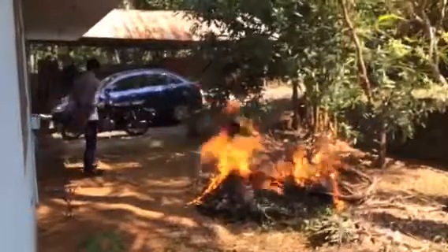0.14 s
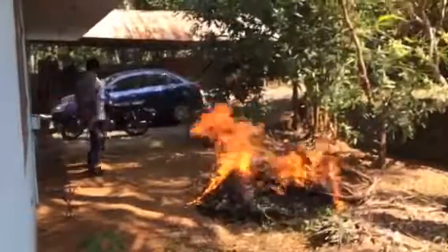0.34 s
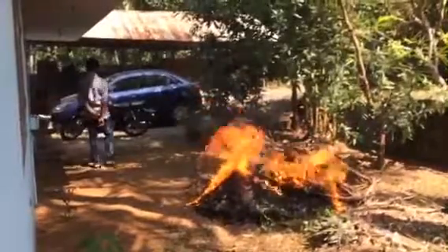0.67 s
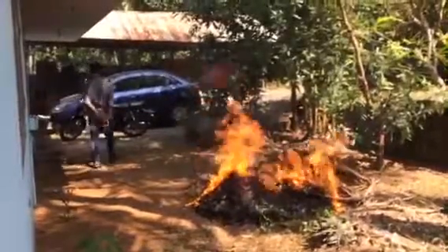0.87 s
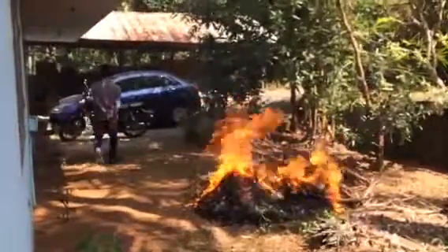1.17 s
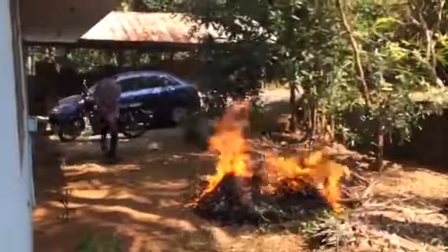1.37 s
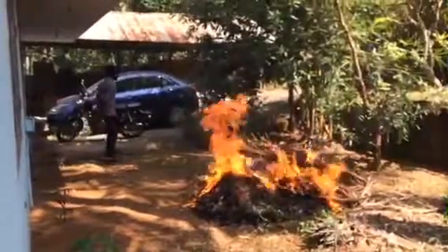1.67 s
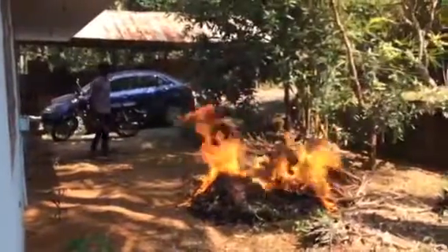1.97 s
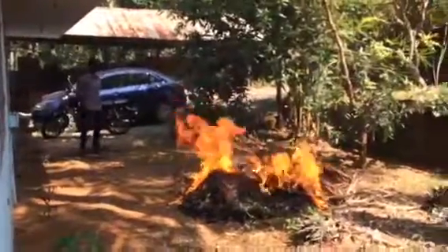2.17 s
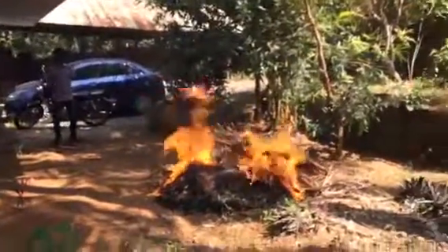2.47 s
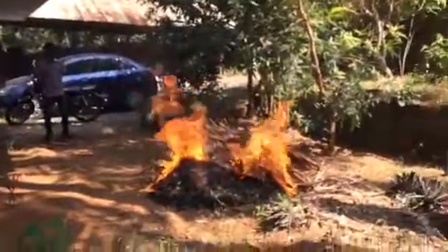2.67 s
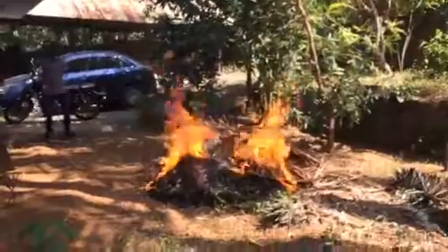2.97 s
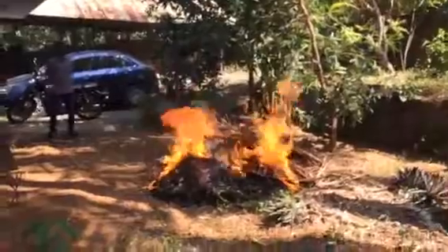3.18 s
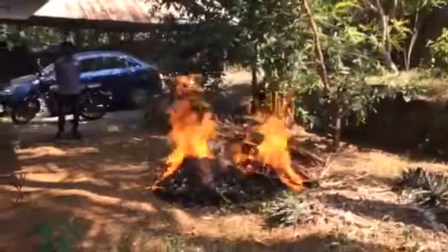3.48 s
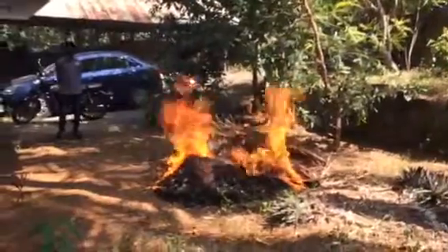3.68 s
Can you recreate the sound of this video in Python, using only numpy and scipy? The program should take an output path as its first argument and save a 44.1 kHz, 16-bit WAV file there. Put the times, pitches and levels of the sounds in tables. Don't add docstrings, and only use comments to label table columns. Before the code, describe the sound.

A leaf and twig fire burns in an open yard, heard from a phone some metres away. Low fluttering rumble, thin hiss and fine sizzle run throughout, with soft gas puffs and tiny ticks. Sharp twig cracks start near 1 s, stronger at 1.56 and 2.26, thickening after 2.4, loudest at 3.28. Faint far whine, hum, hoots and hollow thumps about every second from 0.7.

```python
import sys
import numpy as np
from scipy import signal
from scipy.fft import rfft, irfft
from scipy.io import wavfile
from scipy.ndimage import uniform_filter1d

SR = 44100
rng = np.random.default_rng(int(sys.argv[2]) if len(sys.argv) > 2 else 0)


def dump(signal):
    limited = np.clip(np.atleast_2d(signal).T, -1, 1)
    pcm = np.round(limited * 32767).astype(np.int16)
    wavfile.write(sys.argv[1], SR, pcm)


def to_linear_factor(level_db):
    exponent = np.asarray(level_db, float) / 20
    return 10 ** exponent


N = 169344
T = np.arange(N) / SR
HALF_OCTAVES_HZ = 22 * 2 ** np.arange(0, 10, .5)

# pitch_hz, density_db (per Hz)
ROAR = [(15, -36), (27, -11), (60, -4), (110, 2), (185, -4), (235, -16), (400, -28), (800, -50)]
# pitch_hz, density_db (per Hz)
HISS = [(150, -2), (300, 9), (600, 3), (1100, 2), (2700, -2), (3300, -10), (12300, -8.5), (15500, -10)]
# time_s, sizzle_db
BLAZE = [(0.0, -63), (0.32, -63), (0.65, -59), (0.98, -62), (1.45, -62), (1.68, -59), (1.8, -61),
         (2.21, -61), (2.51, -57), (3.0, -57), (3.15, -55), (3.29, -56), (3.44, -60), (3.72, -61),
         (3.84, -60)]
# time_s, pitch_hz, level_db
WHINE = [(0, 1250, -65), (.5, 1265, -67), (.7, 1262, -63), (.8, 1262, -69), (1.0, 1258, -61),
         (1.065, 1260, -65), (1.1, 1265, -57), (1.16, 1272, -63), (1.3, 1288, -58), (1.38, 1275, -63),
         (1.44, 1268, -71), (1.9, 1269, -69), (2.1, 1275, -70), (2.3, 1280, -68), (2.5, 1275, -70),
         (3.5, 1265, -69), (3.8, 1262, -65), (3.84, 1255, -66)]
# centre_s, length_s, pitch_hz, width_hz, level_db
HOOTS = [(.01, .05, 600, 36, -64), (.65, .1, 575, 36, -68), (2.55, .2, 565, 36, -68),
         (3.4, .3, 620, 36, -69), (2.95, .2, 1650, 700, -65), (.6, 1.6, 2600, 90, -76),
         (.38, .03, 1500, 2200, -62), (3.6, .02, 1000, 900, -60), (3.278, .0015, 1030, 400, -36),
         (1.558, .003, 550, 600, -48), (1.9, .008, 750, 900, -57)]
# start_s, peak_db, body_db and edge_db (re peak), yard_scatter_db
POPS = [(1.0595, -30, -23, -14, -16), (1.1448, -35, -22, -12, -16), (1.263, -36, -22, -14, -15),
        (1.3683, -29, -26, -16, -19), (1.5559, -19, -16, -19, -16), (1.6057, -33, -19, -17, -18),
        (1.8986, -29, -19, -16, -11), (2.0063, -30, -14, -17, -18), (2.2643, -19, -25, -9, -17),
        (2.369, -36, -24, -13, -18), (2.3925, -35, -18, -14, -14), (2.4433, -26, -22, -9, -17),
        (2.6554, -26, -25, -11, -18), (2.7048, -25, -18, -12, -17), (2.7099, -24, -22, -13, -14),
        (2.7536, -28, -21, -12, -16), (2.9168, -32, -24, -13, -15), (3.0031, -30, -15, -11, -12),
        (3.2755, -9, -19, -12, -23), (3.3443, -34, -26, -13, -16), (3.689, -19, -18, -10, -17),
        (3.7004, -22, -24, -17, -14)]
POP_RING_HZ = [6500, 7800, 6500, 5700, 5400, 5200, 6200, 5400, 10000, 9300, 5400, 13000, 11800, 11000, 7000,
               10900, 7400, 10500, 3300, 12000, 8600, 6000]
# start_s, peak_db, body_db and edge_db (re peak)
CALM_TICKS = [(0.2678, -44, -25, -12), (0.3516, -45, -25, -12), (0.3785, -38, -25, -12),
              (0.5194, -47, -25, -12), (0.634, -44, -25, -12), (0.7761, -44, -25, -12),
              (0.9198, -39, -25, -12), (0.9482, -40, -25, -12), (1.4002, -40, -25, -12),
              (1.8562, -42, -25, -12), (2.0423, -48, -25, -12), (2.0687, -44, -25, -12),
              (2.1585, -45, -25, -12), (2.2353, -42, -25, -12), (2.2714, -29, -25, -12),
              (2.2884, -30, -25, -12), (2.4584, -36, -25, -12), (2.5077, -35, -25, -12),
              (2.5461, -41, -25, -12), (2.6, -38, -25, -12)]
# start_s, peak_db, body_db, edge_db
FLARE_TICKS = [(2.7784, -44, -22, -11), (2.8035, -39, -22, -11), (2.8365, -42, -22, -11),
               (2.8659, -35, -22, -11), (3.0934, -41, -22, -11), (3.1208, -34, -22, -11),
               (3.1394, -40, -22, -11), (3.1567, -34, -22, -11), (3.1862, -35, -22, -11),
               (3.2036, -32, -22, -11), (3.2161, -32, -22, -11), (3.237, -36, -22, -11),
               (3.2834, -26, -22, -11), (3.3862, -36, -22, -18), (3.3904, -35, -22, -11),
               (3.4004, -36, -22, -11), (3.4416, -40, -22, -11), (3.5994, -47, -22, -11)]
# start_s, peak_db
FAINT_TICKS = [(.9645, -43), (1.0385, -40), (1.2555, -41), (1.2755, -42), (1.3125, -43), (1.3795, -41),
               (2.9065, -40), (2.9255, -36), (2.9545, -42), (2.9835, -39), (3.0105, -36), (3.0335, -40),
               (3.1265, -37), (3.4175, -42), (3.4725, -43)]
# start_s, peak_db, pitch_hz
RINGING_TICKS = [(.0583, -47, 7000), (.287, -46, 9000), (.392, -42, 8000), (.402, -46, 13000),
                 (.4484, -46, 11000), (.605, -47, 12000), (1.1987, -46, 7000), (1.36, -43, 9500),
                 (1.381, -42, 5000), (1.3915, -43, 10000), (1.0675, -40, 5500), (1.236, -45, 5500),
                 (1.5635, -33, 4500), (1.5672, -33, 4500), (1.5805, -35, 6000), (1.8238, -46, 6000),
                 (1.8602, -44, 4000), (1.8675, -43, 4000), (1.878, -45, 10000), (1.9098, -40, 3500),
                 (1.913, -41, 4000), (1.923, -40, 5000), (1.9965, -44, 9000), (2.0143, -41, 4500),
                 (2.1056, -45, 8800), (2.1944, -48, 7000), (2.764, -38, 10000), (2.8155, -42, 12000),
                 (2.8705, -41, 9000), (2.9615, -43, 6000), (2.978, -43, 12000), (2.9885, -43, 12000),
                 (3.135, -40, 11000), (3.1615, -39, 11000)]
# centre_s, peak_db, pitch_hz
GAS_PUFFS = [(0.062, -40, 91.5), (0.169, -44, 175), (0.284, -45, 96.9), (0.344, -42, 129),
             (0.442, -43, 102), (0.504, -43, 121), (0.554, -41, 105), (0.659, -43, 116), (0.699, -44, 132),
             (0.749, -44, 170), (0.819, -43, 129), (1.062, -47, 121), (1.268, -42, 124), (1.375, -44, 161),
             (1.609, -44, 91.5), (1.735, -45, 105), (1.868, -43, 105), (2.019, -42, 110), (2.094, -47, 102),
             (2.201, -45, 105), (2.239, -40, 99.6), (2.401, -42, 80.7), (2.479, -41, 86.1),
             (2.62, -45, 135), (2.988, -42, 99.6), (3.119, -48, 116), (3.344, -45, 108), (3.497, -43, 105),
             (3.68, -40, 105), (3.794, -39, 99.6)]
# start_s, level_db
THUMPS = [
    (.68, -50),
    (1.55, -44),
    (2.475, -46),
    (3.39, -46),
]
# pitch_hz, level_db, t60_s
THUMP_MODES = [
    (278, 0, .19),
    (175, -2, .2),
]


def level(x, db):
    return x * to_linear_factor(db) / np.sqrt(np.mean(x ** 2))


def band(x, lo_hz, hi_hz):
    return signal.sosfilt(signal.butter(2, [lo_hz, hi_hz], "bandpass", fs=SR, output="sos"), x)


def noise_band(centre_hz, half_width_hz, db):
    return level(band(rng.standard_normal(N), centre_hz - half_width_hz, centre_hz + half_width_hz), db)


def walk(rate_hz):
    hold = int(SR / rate_hz)
    steps = np.repeat(rng.standard_normal(N // 64)[:N // hold + 1], hold)
    return 1.3 * uniform_filter1d(uniform_filter1d(steps, hold), hold)[:N]


def curve(table, col):
    table = np.array(table)
    return np.interp(T, table[:, 0], table[:, col])


def coloured(spectrum, bands_hz, swell_db, flicker_db):
    f = np.fft.rfftfreq(N, 1 / SR) + 1
    hz, db = np.transpose(spectrum)
    shape = to_linear_factor(np.interp(np.log(f), np.log(hz), db))
    out = 0
    for centre_hz in bands_hz:
        share = np.clip(1 - np.abs(np.log2(f / centre_hz)) * 2, 0, 1) ** .5
        noise = irfft(rfft(rng.standard_normal(N)) * shape * share, N)
        out = out + noise * to_linear_factor(swell_db + flicker_db * walk(9))
    return out


def flames():
    roar = coloured(ROAR, HALF_OCTAVES_HZ[:13], 1.2 * walk(13), flicker_db=.6)
    hiss = coloured(HISS, HALF_OCTAVES_HZ[5:], .5 * walk(3), flicker_db=.8)
    return level(roar, -54) + level(hiss, -60.3)


def sizzle():
    ticks_per_s, spread_db = 200, 3
    tick_s, smear_s = .0008, .015
    wash_db, smear_db = 1.5, -1
    size = to_linear_factor(spread_db * np.minimum(rng.exponential(size=N), 3.5))
    hits = (rng.random(N) < ticks_per_s / SR) * size

    def fading_noise(fade_s):
        envelope = signal.lfilter([1], [1, -np.exp(-1 / (fade_s * SR))], hits)
        return level(envelope * rng.standard_normal(N), 0)

    mix = fading_noise(tick_s) + to_linear_factor(wash_db) * rng.standard_normal(N) + to_linear_factor(smear_db) * fading_noise(smear_s)
    return level(band(mix, 2000, 16000), -2.6) * to_linear_factor(curve(BLAZE, 1))


def machine_whine():
    width_hz, tone_db, octave_db = 140, -6, -13
    phase = 2 * np.pi * np.cumsum(curve(WHINE, 1) * (1 + .008 * walk(25))) / SR

    def breath(harmonic):
        rate_hz = harmonic * width_hz
        return walk(rate_hz) * np.sin(harmonic * phase) + walk(rate_hz) * np.cos(harmonic * phase)

    tone = np.sin(phase) * to_linear_factor(tone_db + 3 * walk(20))
    return to_linear_factor(curve(WHINE, 2) - 1.2) * (breath(1) + tone + to_linear_factor(octave_db) * breath(2))


def machine_hum():
    return noise_band(400, 45, -67) * to_linear_factor(2.5 * walk(3))


def hoots_and_knocks():
    out = np.zeros(N)
    for at, length_s, hz, width_hz, db in HOOTS:
        out += noise_band(hz, width_hz / 2, db) * np.exp(-((T - at) / length_s) ** 2)
    return out


def ring(x, hz, db):
    return x + (to_linear_factor(db) - 1) * signal.lfilter(*signal.iirpeak(hz, 3, fs=SR), x)


def cracks():
    rise_s, burst_s, growth_s_per_db, late_s = .0003, .0008, .00001, .0008
    snap_db, ground_s, ground_db = 7, .00055, -7
    scatter_fade_s, scatter_delay_s, patch_db = .03, .002, 2.8
    tick_scatter_db, faint_body_db, faint_edge_db = -20, -24, -12
    thud_hz, body_hz, crack_hz, edge_hz = 300, 750, 3400, 7800

    faint_colour = (faint_body_db, faint_edge_db, tick_scatter_db)
    rows = list(POPS)
    rows += [(*tick, tick_scatter_db) for tick in list(CALM_TICKS) + list(FLARE_TICKS)]
    rows += [(*tick, *faint_colour) for tick in FAINT_TICKS]
    rows += [(at, db, *faint_colour) for at, db, _ in RINGING_TICKS]
    start_s, peak_db, body_db, edge_db, scatter_db = np.array(rows).T[:, :, None]

    size = 6144
    t = np.arange(size) / SR
    burst_noise, tail_noise, patch_noise = rng.standard_normal((3, len(rows), size))
    decay_s = burst_s + growth_s_per_db * (peak_db + 45)
    puff = burst_noise * (1 - np.exp(-t / rise_s)) * np.exp(-t / decay_s)
    snap = np.zeros(size)
    snap[4] = to_linear_factor(snap_db)
    snap[4 + int(ground_s * SR)] = to_linear_factor(snap_db + ground_db)
    burst = .45 * puff + .5 * snap
    burst = burst / np.sqrt(np.max(uniform_filter1d(burst ** 2, size=32), axis=1, keepdims=True)) / 2

    patch = uniform_filter1d(patch_noise, size=36) * 6
    tail = tail_noise * to_linear_factor(scatter_db + patch_db * patch)
    tail = tail * np.exp(-(t / scatter_fade_s) ** 1.4) * (1 - np.exp(-t / scatter_delay_s))

    def in_yard(tail_db):
        return burst + to_linear_factor(tail_db) * tail / 2

    crack = to_linear_factor(-.8) * band(in_yard(0), crack_hz, edge_hz)
    edge = to_linear_factor(edge_db + 14.5) * band(in_yard(-3), edge_hz, 18000)
    thud = to_linear_factor(-12) * band(burst, thud_hz, body_hz)
    body = to_linear_factor(body_db + 17) * (band(in_yard(-4), body_hz, crack_hz) - thud)
    x = edge + body - crack

    for k, hz in enumerate(POP_RING_HZ):
        x[k] = ring(x[k], hz, 5)
    first_ringing = len(rows) - len(RINGING_TICKS)
    for k, (_, _, hz) in enumerate(RINGING_TICKS, first_ringing):
        x[k] = ring(x[k], hz, 13)
    x = x / np.max(np.abs(x), axis=1, keepdims=True) * to_linear_factor(peak_db - .2)

    out = np.zeros(N + 2 * size)
    for start, sound in zip(((start_s[:, 0] + late_s) * SR).astype(int), x):
        out[start:start + size] += sound
    return out[:N]


def gas_puffs():
    lag_s, length_cycles = .015, 1.3
    out = np.zeros(N)
    for at, db, hz in GAS_PUFFS:
        cycles = (T - at - lag_s) * hz
        out -= to_linear_factor(db - 3) * np.exp(-(cycles / length_cycles) ** 2) * np.cos(2 * np.pi * cycles)
    return out


def hollow_thumps():
    out = np.zeros(N)
    t = np.arange(8192) / SR
    for at, db in THUMPS:
        start = int(at * SR)
        for hz, mode_db, t60_s in THUMP_MODES:
            envelope = to_linear_factor(db + mode_db - 60 * t / t60_s) * (1 - np.exp(-t / .008))
            out[start:start + len(t)] += envelope * np.sin(2 * np.pi * hz * t)
    return out


def scene():
    fire = flames() + sizzle() + cracks() + gas_puffs()
    distance = machine_whine() + machine_hum() + hoots_and_knocks() + hollow_thumps()
    return (fire + distance)[None]


def roll_off(x):
    return signal.sosfilt(signal.butter(12, 16530, fs=SR, output="sos"), x)


def record(dry):
    top_hz, leak_db = 15150, -41
    cut = signal.sosfilt(signal.ellip(10, .2, 70, top_hz, fs=SR, output="sos"), dry)
    return roll_off(cut + to_linear_factor(leak_db) * dry)


dry = scene()
out = record(dry)
dump(out)
```